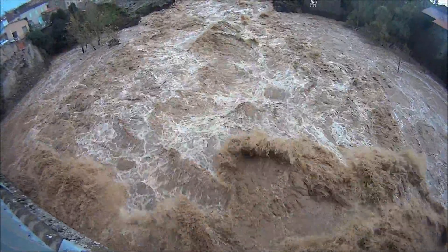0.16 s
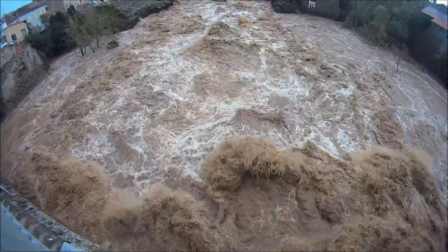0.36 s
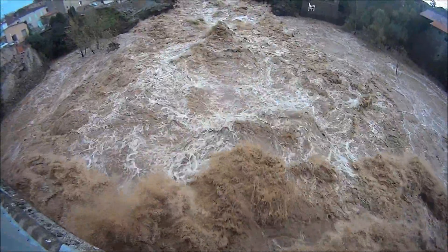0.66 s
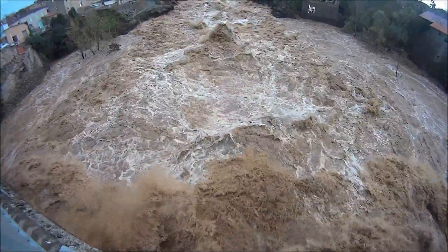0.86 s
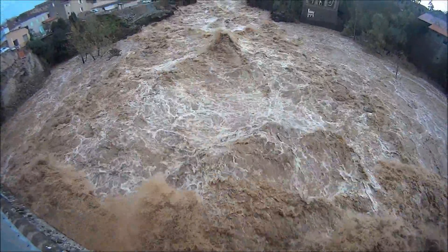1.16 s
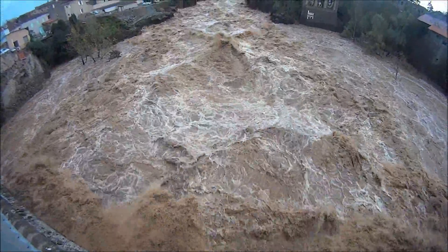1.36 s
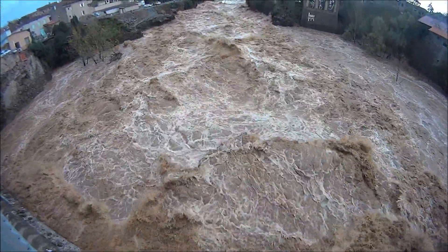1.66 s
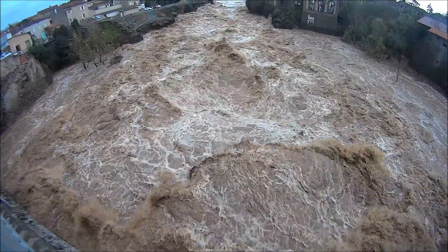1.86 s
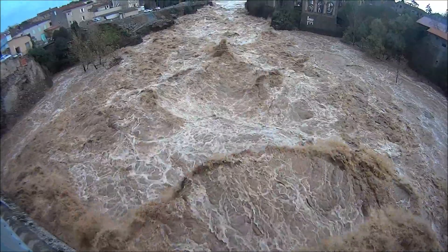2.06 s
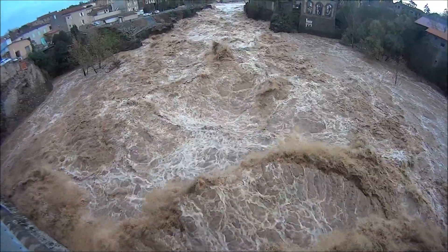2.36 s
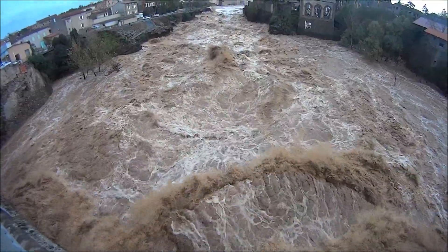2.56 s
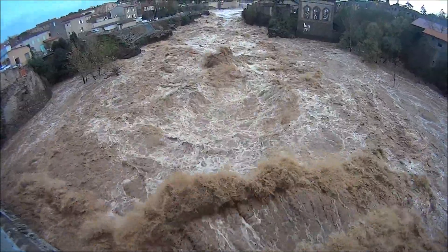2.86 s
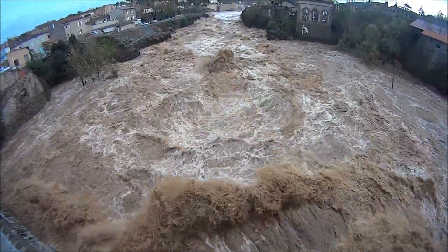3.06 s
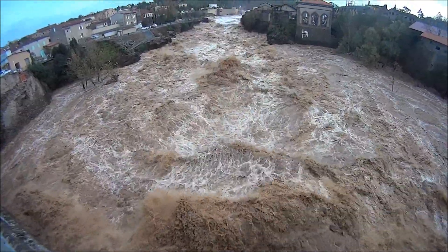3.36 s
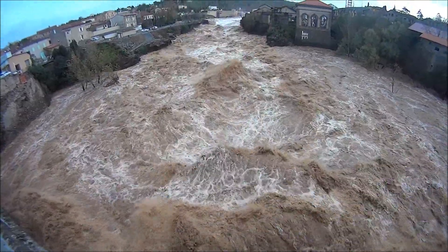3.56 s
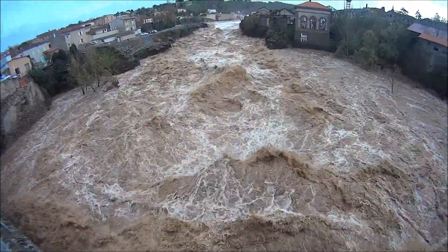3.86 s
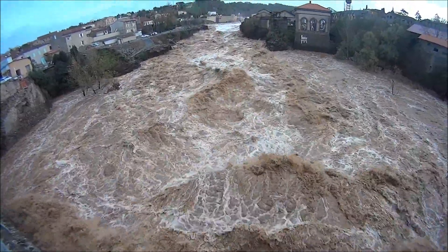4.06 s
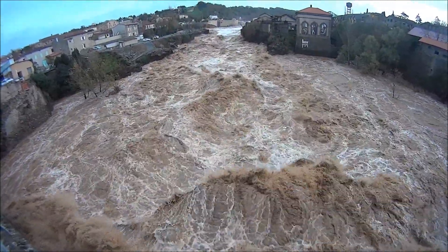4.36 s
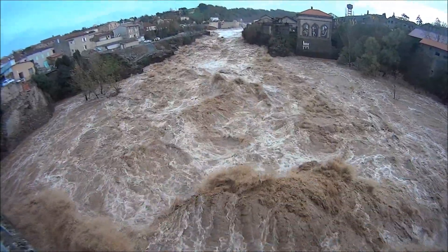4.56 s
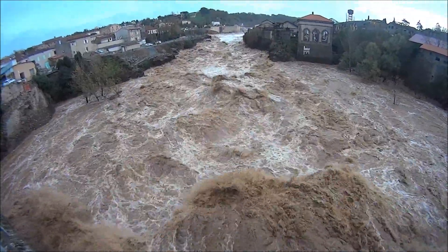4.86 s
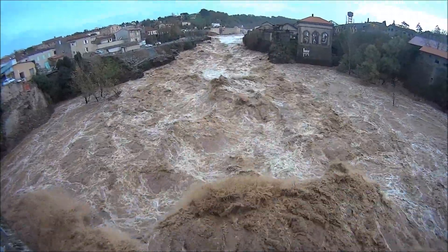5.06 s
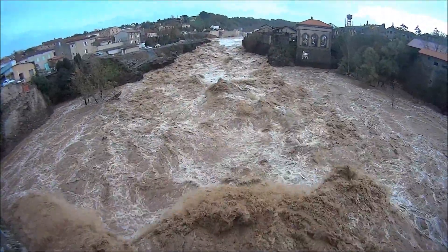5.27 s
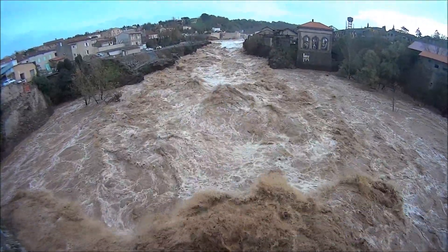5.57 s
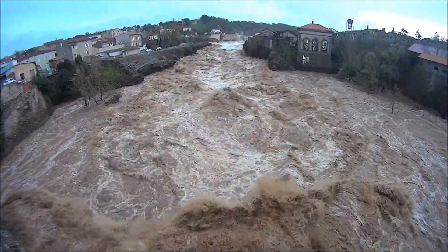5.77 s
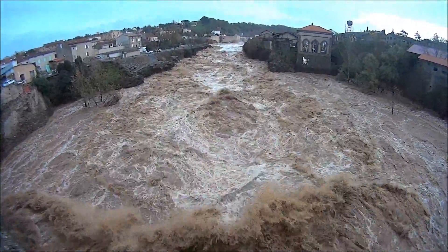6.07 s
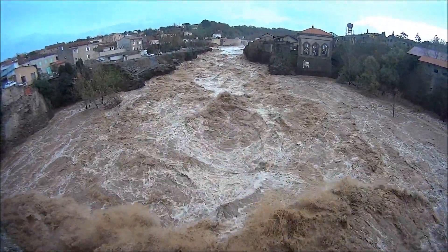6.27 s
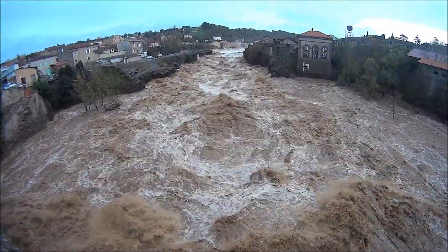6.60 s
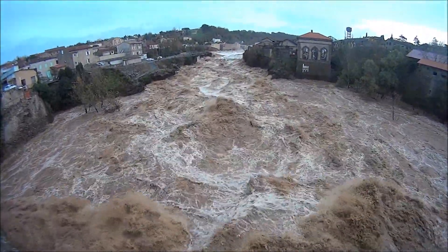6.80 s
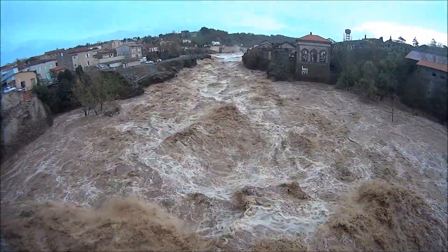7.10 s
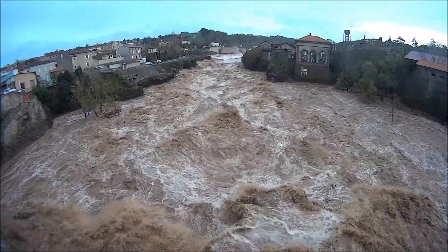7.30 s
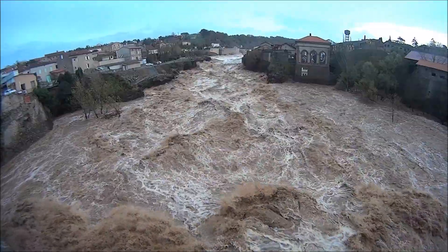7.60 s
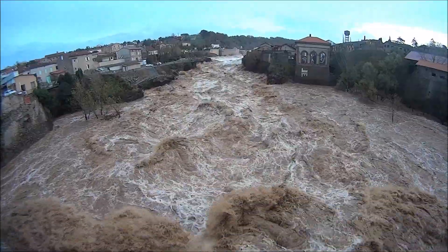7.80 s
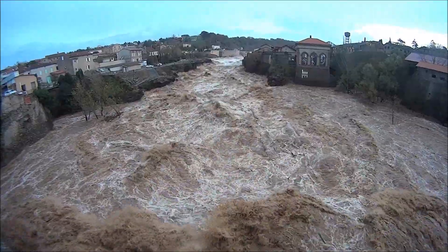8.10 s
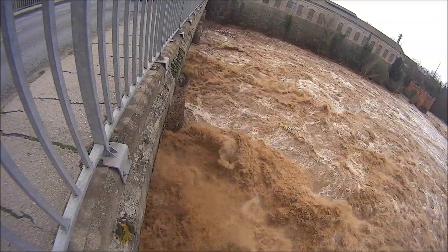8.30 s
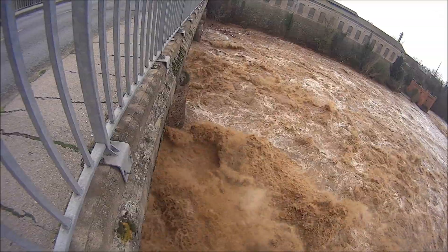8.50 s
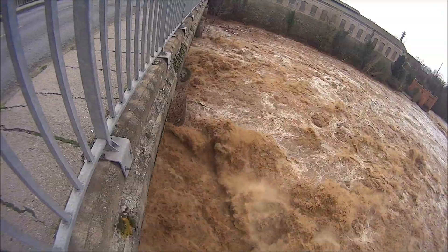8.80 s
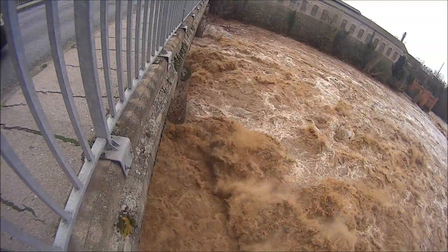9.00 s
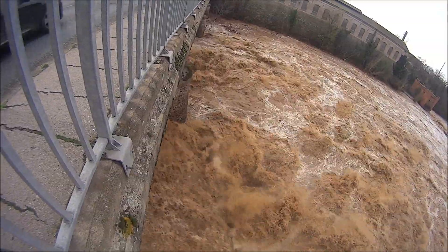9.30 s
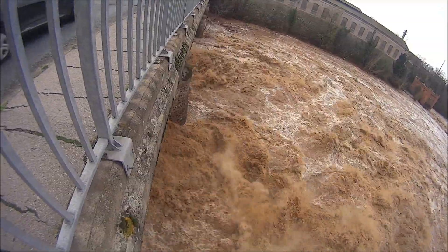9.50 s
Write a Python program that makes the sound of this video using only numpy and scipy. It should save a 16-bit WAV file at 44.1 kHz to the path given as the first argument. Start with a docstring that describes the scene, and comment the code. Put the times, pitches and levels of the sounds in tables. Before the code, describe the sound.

Muddy floodwater roars steadily outdoors with a boxy, muffled midrange colour, surging gently, then abruptly becomes louder and closer after eight seconds.

```python
"""A flooded river rushes under a bridge, heard at the two ports of a small camera's closed waterproof case.
The camera first faces downstream: foam noise rumbles, churns, splashes and fizzes, and fine spray thins out.
Just after eight seconds it is suddenly at a pier, where the water is nearer and louder.
Surges and collapsing crests move the level throughout; the case colours it all, most near 1.5 kHz.
Five brief rings of the case's main resonance, near 1.5 kHz, stand out of the noise."""
import sys
import numpy as np
from scipy import signal
from scipy.fft import rfft, irfft, next_fast_len
from scipy.io import wavfile

SR = 44100
rng = np.random.default_rng(int(sys.argv[2]) if len(sys.argv) > 2 else 0)


def put_to_file(sound):
    """Save the sound as 16-bit audio at rate SR, in the file named by the first command-line argument."""
    columns = np.atleast_2d(sound).T  # one column per channel
    safe = np.clip(columns, -1, 1)
    whole_steps = np.round(safe * 32767)
    wavfile.write(sys.argv[1], SR, whole_steps.astype(np.int16))


N = 425565
PIER_S = 8.255  # the camera is at the pier from here on

# How hard the standing wave below the bridge surges about its usual level.
# Each row: time in seconds, surge in dB.
SURGE = [(0.0, 0.4), (1.59, -0.2), (1.94, -2), (2.65, 0.2), (3.17, -0.2), (3.75, 0.9), (4.03, -1.6),
         (4.42, -1.8), (5.45, 0.34), (5.83, -0.4), (6.17, -0.4), (6.44, 0.5), (7.1, 0.5), (7.17, 1.5),
         (7.66, -0.2), (8.38, 0.1), (8.66, 1), (9.65, -0.6)]
# How the water's four voices follow its motion; the rows are rumble, churn, splash and fizz.
# Each row: dB per dB of surge, dB per dB of crest, rms of the quick random tumbling in dB, trim in dB.
RESPONSE = [(0.5, .65, 0.48, -.05), (0.5, 0.9, 0.5, -0.14), (1.0, .5, 0.23, .05), (1.3, 0.5, 0.2, -.5)]
RUMBLE_TOP_HZ, CHURN_TOP_HZ, SPLASH_TOP_HZ = 1150, 2150, 3700
MIST_DB, MIST_S = 1.84, 5.7  # initial lift of the fizz by hanging spray, and the time it takes to thin out


def river(t, foam, place):
    """Foam noise in the case; surge lifts mostly splash and fizz, crests mostly rumble and churn."""
    size = next_fast_len(len(t), True)
    hz = np.fft.rfftfreq(size, 1 / SR)
    ports = through_case(rfft(foam, size), hz, place)

    # differences of successive low-passes split the spectrum into four bands that sum to one
    lowpasses = [1 / (1 + (hz / top) ** 10) for top in (RUMBLE_TOP_HZ, CHURN_TOP_HZ, SPLASH_TOP_HZ)]
    bands = np.diff(lowpasses, axis=0, prepend=0, append=1)

    surge_db = np.interp(t, *np.transpose(SURGE))
    crest_db = crests(t)
    voices = []
    for band, (by_surge, by_crest, tumble_db, trim_db) in zip(bands, RESPONSE):
        level_db = trim_db + by_surge * surge_db + by_crest * crest_db
        level_db = level_db + tumble_db * wander(t, per_s=16)
        voice = irfft(ports * band, size)[:, :len(t)]
        voices.append(voice * gain_of(level_db))
    rumble, churn, splash, fizz = voices
    mist_db = MIST_DB * np.maximum(1 - t / MIST_S, 0)
    return rumble + churn + splash + fizz * gain_of(mist_db)


# Crests of the standing wave that build up and collapse.
# Each row: time of the collapse in seconds, lift in dB before each voice's response.
CRESTS = [(0.28, 0.5), (0.87, 1.5), (2.39, 1), (2.92, 1.4), (3.62, 1.0), (5.83, 2.1), (6.69, 1.5),
          (7.96, 1.1), (9.41, 1.1)]
CREST_BUILD_S, CREST_FALL_S = 0.29, 0.096


def crests(t):
    """Lift in dB from the crests: each builds slowly and falls fast."""
    times, rise_and_fall = [-CREST_BUILD_S, 0, CREST_FALL_S], [0, 1, 0]
    return sum(db * np.interp(t - s, times, rise_and_fall) for s, db in CRESTS)


def foam_bursts(t, per_s, spread_db, share):
    """Two streams of foam: countless tiny bursts merge to noise, larger ones stand out as clicks.

    share is the part of the power that goes to the clicks."""
    shape = (2, len(t))
    merged = rng.standard_normal(shape)
    size = gain_of(spread_db * np.minimum(rng.exponential(1, shape), 4))
    polarity = np.sign(rng.standard_normal(shape))
    happens = rng.random(shape) < per_s / SR
    clicks = evened(size * polarity * happens)
    return np.sqrt(1 - share) * merged + np.sqrt(share) * clicks


# Resonances of the closed case as they reach its two ports.
# Each row: centre in Hz, width in Hz, then three columns for the view downstream and the same three
# for the pier: level in dB per Hz, left minus right in dB, phase lead of the left port in radians.
CASE = [(94.0, 110, -72.9, -0.1, -0.4, -75, 0.4, -0.1), (195, 115, -67.6, -1.2, -0.43, -64, -1.2, -0.8),
        (290, 125, -67, -1.5, -0.7, -71, -1.9, -0.5), (392, 82, -68.5, 0.5, -2.5, -63, -3.4, -1.7),
        (510, 160, -74.5, 1.6, -2.0, -66.3, -2, -2.0), (774, 360, -71.2, -6.1, -0.33, -69.5, -6, -0.6),
        (1035, 136.0, -75.5, -15, -1.5, -69.5, -13.8, -1.5), (1340, 127, -65.1, 2, -0.5, -59.5, 2.6, -1.5),
        (1488, 148, -52, -5.5, -0.45, -49, -6.5, -0.5), (1620.0, 170, -51, -5.5, 0.06, -46.5, -5.5, -0.24),
        (2025, 240, -67.0, -4, -0.5, -63.5, -2.2, -1), (2454, 200, -67.5, 6.5, 2.2, -65.5, 6, 0.7),
        (2712.0, 360, -65.3, 7, 3, -64, -1, -3), (3050, 290, -71, -10, 2, -65, 3, 0.65),
        (3414, 200, -68.5, -7.5, -1, -68, -2, -2), (3570, 323.0, -75, 9, -3, -73, 3.3, -2.2),
        (4115, 295, -64.5, 2.5, -2.5, -62, -1.4, -2.5), (4850, 870, -72, -4, 1.65, -67, -3.5, 1.05),
        (5025, 392, -65, -5.5, 0.05, -63.5, -6.4, -0.5), (5723.0, 460, -72, -0.5, 0.0, -70.9, 11, -1),
        (6240, 570, -81, 13, -0.7, -73, 7.0, 1), (6900, 490, -76.5, -1, -3.5, -73.4, 0.8, -1.5),
        (7565, 550, -72.5, 2, 0.63, -69, 2.1, 1), (8560, 300, -77.5, 0, 1, -77, 0.6, 0.8),
        (9700, 900, -84.5, 3.2, 1.2, -77.5, 3, 1.0)]
# Diffuse wash that reaches the two ports unrelated.
# Each row: frequency in Hz, level facing downstream in dB per Hz, level at the pier in dB per Hz.
WASH = [(30.0, -86.2, -86.3), (200.0, -79.5, -72), (500.0, -76.5, -72.5), (1100.0, -74.5, -72),
        (2300.0, -74, -70), (3180, -72, -65.5), (4500.0, -80, -74.5), (6000.0, -81, -74),
        (8000.0, -80.0, -75.5), (9960, -83.8, -80.1), (10800.0, -89, -85)]


def through_case(streams, hz, place):
    """Spectra at the two ports: every resonance reaches them with its own balance and phase."""
    case, wash = np.array(CASE), np.array(WASH)
    grid = np.geomspace(10, SR / 2, 1500)  # Hz
    centre, width = case[:, :2].T[:, :, None]
    db, balance_db, lead = np.split(case[:, 2:].T[:, :, None], 2)[place]
    power = gain_of(db) ** 2 / (1 + ((grid - centre) / width) ** 2) ** 3
    wash_db = np.interp(np.log(grid), np.log(wash[:, 0]), wash[:, 1 + place])
    diffuse = gain_of(wash_db) ** 2

    # an amplitude gain applied to power puts half the balance in dB on each side
    left = (power * gain_of(balance_db)).sum(0) + diffuse
    right = (power / gain_of(balance_db)).sum(0) + diffuse
    # the part of the left port that moves with the right, and the rest
    shared = (power * np.exp(1j * lead)).sum(0) / np.sqrt(right)
    own = np.sqrt(np.maximum(left - abs(shared) ** 2, 0))

    shared, own, right = (np.interp(hz, grid, g) for g in (shared, own, np.sqrt(right)))
    left_port = shared * streams[0] + own * streams[1]
    right_port = right * streams[0]
    return np.sqrt(SR / 2) * np.array([left_port, right_port])  # density per Hz to amplitude


# Brief rings of the case's main resonance that stand out of the noise.
# Each row: start in seconds, envelope peak in dB before the common level and balance, rise in seconds.
RINGS = [(0.5831, -14, .001), (1.4324, -13, .0011), (3.979, -10, .0016), (6.6695, -10, .0025),
         (8.307, -11, .0014)]


def rings(ring_hz, level_db, left_db):
    """The main resonance of the case swells and dies away within milliseconds, stronger on the right."""
    out, t = np.zeros((2, N)), np.arange(1024) / SR
    for s, db, rise_s in RINGS:
        envelope = t / rise_s * np.exp(1 - t / rise_s)  # reaches 1 after rise_s
        ring = envelope * np.sin(2 * np.pi * ring_hz * t)
        add(out, s, gain_of(db + level_db) * np.array([gain_of(left_db) * ring, ring]))
    return out


def wander(t, per_s):
    """Random motion of rms 1, in straight lines between per_s random points a second."""
    knots = rng.standard_normal(2048)
    return evened(np.interp(t * per_s, np.arange(len(knots)), knots))


def gain_of(db):
    """Decibels to amplitude."""
    return 10 ** (np.asarray(db) / 20)


def evened(x):
    """Scales to rms 1."""
    return x / np.sqrt(np.mean(x ** 2) + 1e-20)


def add(mix, s, sound):
    """Adds a stereo sound into the mix at time s in seconds."""
    part = mix[:, max(round(s * SR), 0):][:, :sound.shape[1]]
    part += sound[:, :part.shape[1]]


def scene():
    """The view downstream, then the nearer water at the pier, with the brief rings over both."""
    far, near = np.split(np.arange(N) / SR, [round(PIER_S * SR)])
    far_foam = foam_bursts(far, per_s=2000, spread_db=2.5, share=0.087)
    downstream = river(far, far_foam, place=0)
    near_foam = foam_bursts(near, per_s=2000, spread_db=2.5, share=0.1)
    pier = river(near, near_foam, place=1)
    return np.hstack([downstream, pier]) + rings(ring_hz=1550, level_db=-1, left_db=-5.5)


def record(dry):
    """The recorder's band limit: a steep low-pass at 11 kHz."""
    lowpass = signal.firwin(1023, 11000, window=("kaiser", 9), fs=SR)
    return signal.oaconvolve(dry, lowpass[None], "same")


dry = scene()
out = record(dry)
put_to_file(out)
```